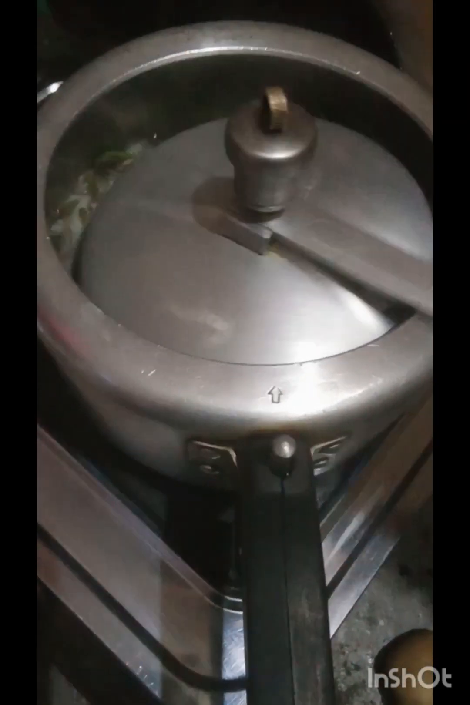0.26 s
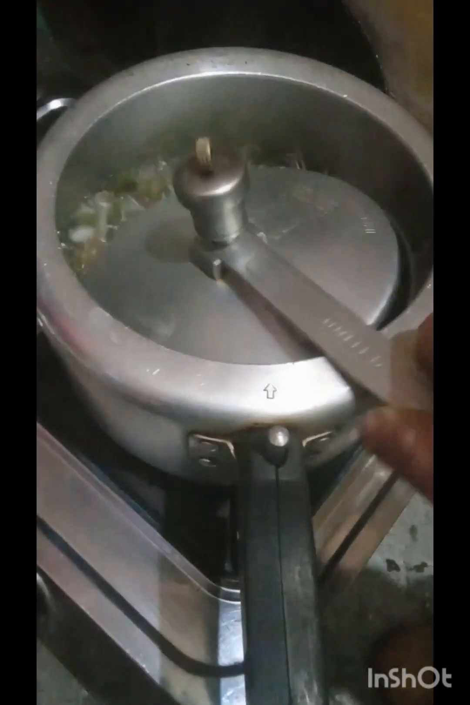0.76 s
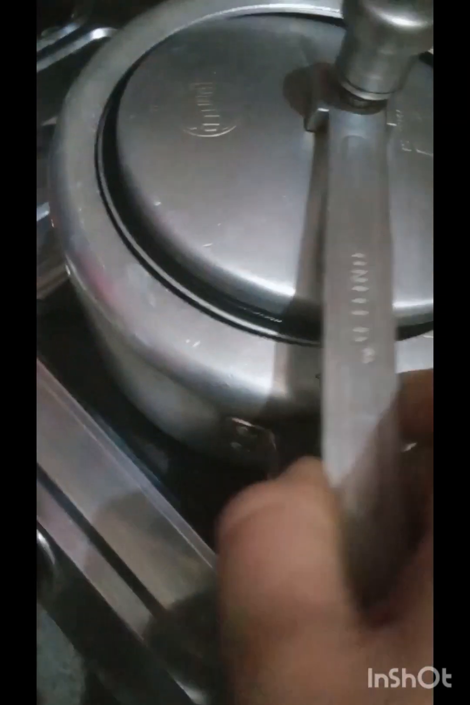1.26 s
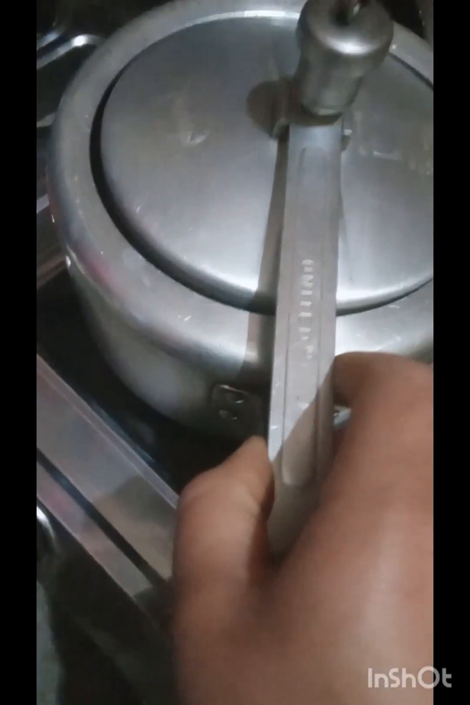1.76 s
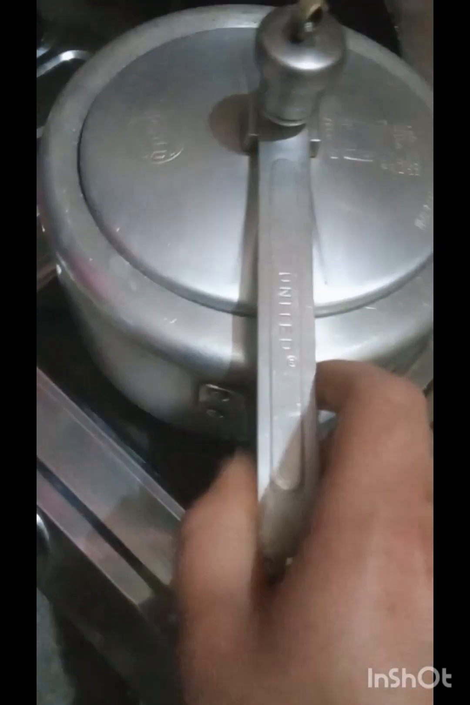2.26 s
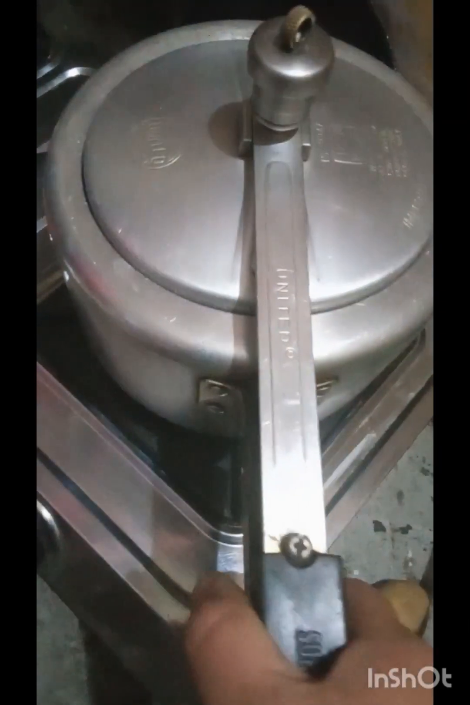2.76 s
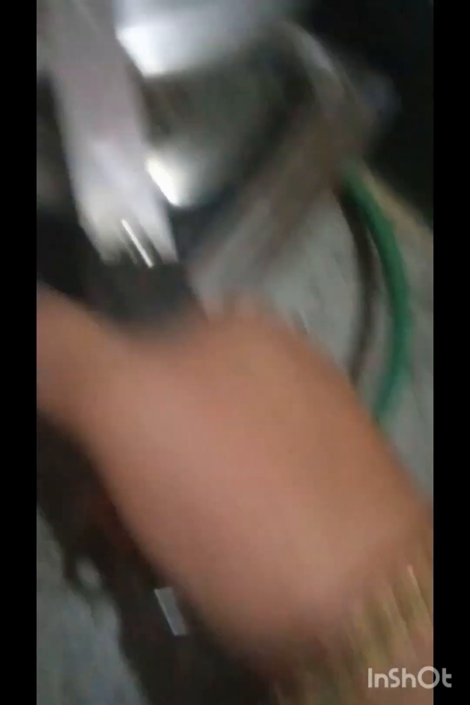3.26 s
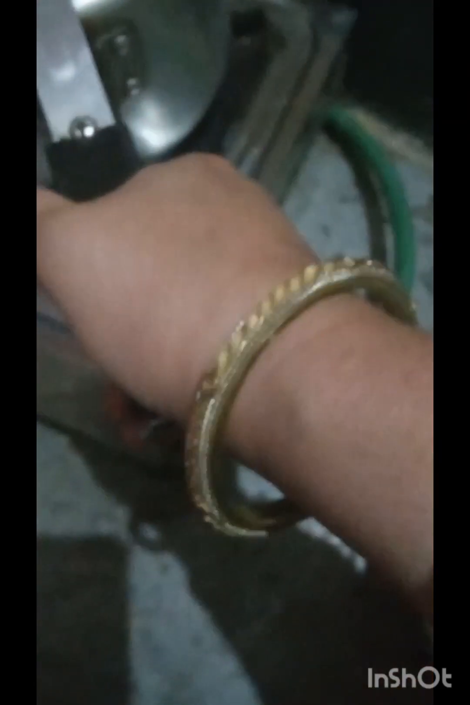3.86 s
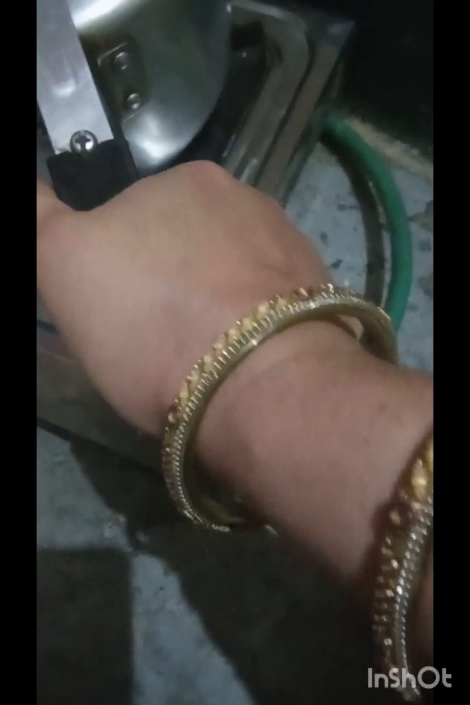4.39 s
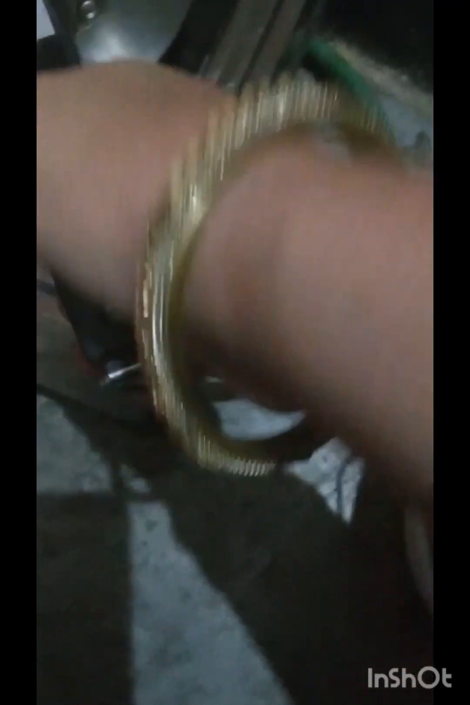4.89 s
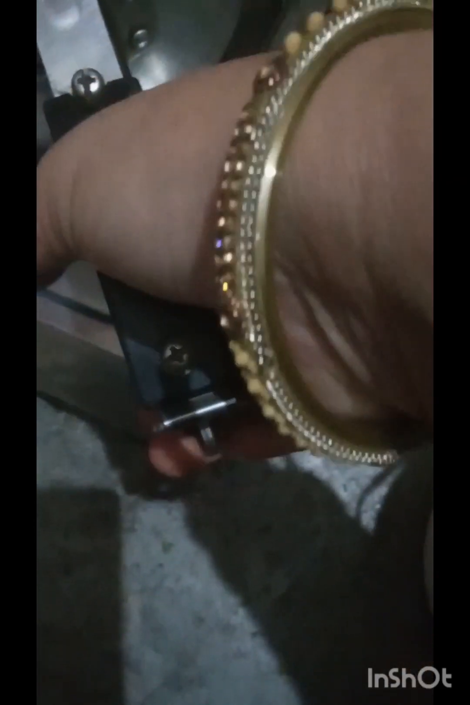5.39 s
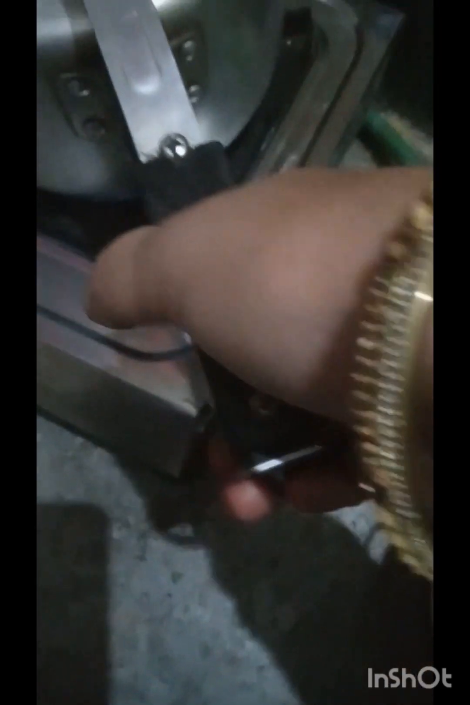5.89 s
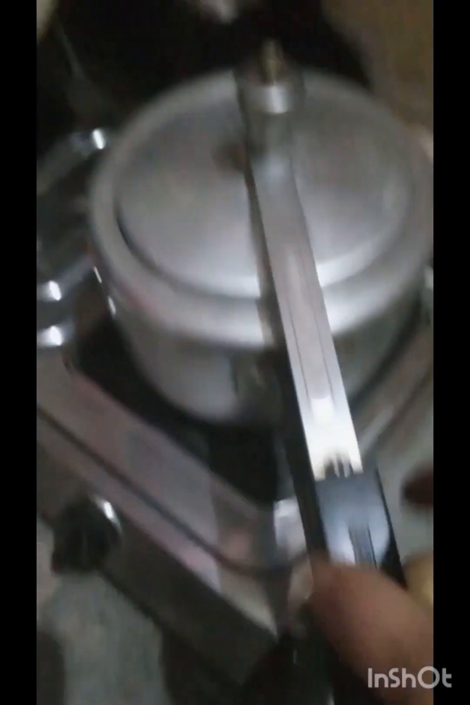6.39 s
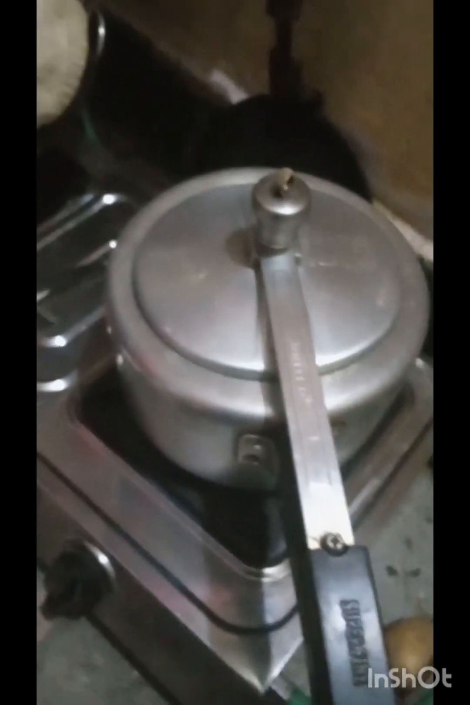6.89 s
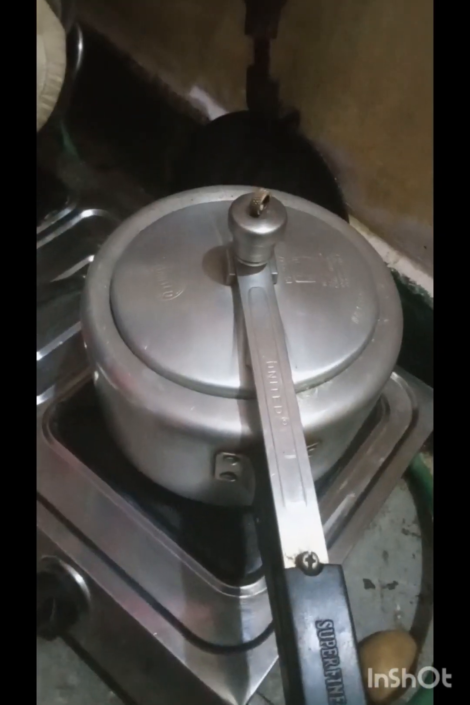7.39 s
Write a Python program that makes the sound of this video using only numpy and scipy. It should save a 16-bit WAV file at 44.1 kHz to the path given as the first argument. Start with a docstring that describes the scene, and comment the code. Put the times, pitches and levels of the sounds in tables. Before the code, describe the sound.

In a small hard kitchen, close to a phone, a cooker bubbles with low gurgle and bright popping. A metal lid clanks and scrapes into the pot, dulling the bubbles. The handle clicks and snaps shut with a light jingle, and the bubbling is sealed off. After a near-quiet stretch of tiny touches come a double knock, a short singing squeak, and faint gas hiss.

```python
"""A pressure cooker bubbles, low gurgle and bright popping, in a small, hard kitchen, heard by a phone held close.
Its metal lid clanks into the pot (struck modes and noise cracks) and muffles the bubbling; the handle bar clicks
as it is pressed shut, bangles jingle, and the gasket seals off the rest. Small knocks and brushes move on to the stove.
The gas burner then hisses faintly (flickering noise bands), and a dry metal joint squeaks (stick-slip tones)."""
import sys
import numpy as np
from scipy import signal
from scipy.fft import rfft, irfft
from scipy.io import wavfile
from scipy.ndimage import uniform_filter1d

SR = 44100
rng = np.random.default_rng(int(sys.argv[2]) if len(sys.argv) > 2 else 0)


def transcribe(signal):
    """Save signal, clipped to [-1, 1], as a 16-bit WAV file at the path in sys.argv[1]."""
    frames = np.atleast_2d(signal).T
    limited = np.clip(frames, -1, 1)
    pcm = np.round(limited * 32767).astype(np.int16)
    wavfile.write(sys.argv[1], SR, pcm)


N = 337264
TIME = np.arange(N) / SR
RING_TIME = np.arange(SR // 3) / SR

# spectral outline of the popping and of the scraping rim: (frequency [Hz], gain [dB])
POP_COLOUR = [(200, -21.5), (450, -11), (700, -8), (1600, -3), (2000, -8), (2700, -7), (3200, -18),
              (4200, -14), (6000, -17.5), (9000, -28), (12000, -38.5), (16000, -38.5)]
# spectral outline of skin on the handle and of the squeak's rasp: (frequency [Hz], gain [dB])
RASP_COLOUR = [(40, -45), (500, 6), (1300, 6.5), (5500, 4), (8500, -16), (9700, -16), (11000, -26),
               (15500, -24)]


def undb(db):
    """Decibels to amplitude ratio."""
    return 10 ** (np.asarray(db) / 20)


def unit(x):
    """Scale to rms 1."""
    return x / np.sqrt(np.mean(x ** 2) + 1e-20)


def curves(table):
    """Columns of a table, joined by straight lines in time."""
    s, *columns = np.transpose(table)
    return [np.interp(TIME, s, c) for c in columns]


def walk(rate_hz):
    """Smooth chance of rms 1: noise averaged twice over 1 / rate."""
    size = max(int(SR / rate_hz), 2)
    once = uniform_filter1d(rng.standard_normal(N), size)
    return unit(uniform_filter1d(once, size))


def colour(x, points):
    """Minimum-phase filter with the given (Hz, dB) outline, built from its cepstrum."""
    size = 2048
    hz, db = np.transpose(points)
    bin_hz = np.arange(size // 2 + 1) * SR / size
    gain = undb(np.interp(np.log(bin_hz + 1), np.log(hz), db))
    cepstrum = irfft(np.log(gain))
    # fold the cepstrum to make the filter causal
    cepstrum[1:size // 2] *= 2
    cepstrum[size // 2 + 1:] = 0
    impulse = irfft(np.exp(rfft(cepstrum)))
    return signal.fftconvolve(x, impulse)[:len(x)]


def splitter(edges_hz):
    """Butterworth filters for the bands below, between and above the edges."""
    order = 4
    lowest = signal.butter(order, edges_hz[0], fs=SR, output="sos")
    inner = [signal.butter(order, pair, "band", fs=SR, output="sos") for pair in zip(edges_hz, edges_hz[1:])]
    highest = signal.butter(order, edges_hz[-1], "high", fs=SR, output="sos")
    return [lowest, *inner, highest]


FOUR_BANDS, TWO_BANDS = splitter([900, 1600, 4500]), splitter([4500])
HISS_BANDS = splitter([1500, 3000, 4700, 5700, 7300])


def fade(t, t60):
    """Exponential decay by 60 dB in t60, in the unit of t."""
    return np.exp(-np.log(1000) * t / max(t60, .002))


def add(out, s, sound):
    """Mix a sound in at s seconds."""
    start = max(int(s * SR), 0)
    out[start:start + len(sound)] += sound[:N - start]


def room(x, wet_db):
    """Close hard walls: a diffuse tail that dies slightly sooner in the treble."""
    t60_low_s, t60_high_s, gap_s = 0.32, 0.3, 0.0038
    t = TIME[:SR // 2]
    tail = np.zeros(len(t))
    for sos, t60_s in zip(FOUR_BANDS, np.linspace(t60_low_s, t60_high_s, len(FOUR_BANDS))):
        tail += signal.sosfilt(sos, rng.standard_normal(len(t))) * fade(t, t60_s)
    # silent for one gap, then rising over a second
    tail *= np.clip(t / gap_s - 1, 0, 1)
    return x + undb(wet_db) * signal.fftconvolve(x, tail / np.linalg.norm(tail))[:N]


def ring(modes, detune=1 / 700, patchy_db=2):
    """Free decay of an object; every contact weights and detunes its modes differently."""
    out = np.zeros(len(RING_TIME))
    for (hz, db, t60_s), chance in zip(modes, rng.standard_normal((len(modes), 3))):
        gain = undb(db + patchy_db * chance[0]) * np.sign(chance[1])
        tone = np.sin(2 * np.pi * hz * (1 + detune * chance[2]) * RING_TIME)
        out += gain * tone * fade(RING_TIME, t60_s)
    return out


def crack(t60_s, dense_db, snap_db, snap_s):
    """Noise for the snap of a contact and the crowd of short-lived modes that follows it."""
    envelope = undb(dense_db) * fade(RING_TIME, t60_s) + undb(snap_db) * fade(RING_TIME, snap_s)
    return rng.standard_normal(len(RING_TIME)) * envelope


def chatter(blow, span_s, bounce_db, count=5):
    """Metal never lands just once: a few weaker touches follow within milliseconds."""
    out = blow.copy()
    for when, size in rng.random((count, 2)):
        lag = 1 + int(span_s * SR * when)
        out[lag:] += undb(bounce_db) * (2 * size - 1) * blow[:-lag]
    return out


def strike(blow, bands, levels_db):
    """The spot that is hit sets the strength of each band over the first 8 ms."""
    attack = SR // 125
    parts = [signal.sosfilt(sos, blow) for sos in bands]
    return sum(p * undb(db) / np.std(p[:attack]) for p, db in zip(parts, levels_db))


def blow_levels(db, ring_db, treble_db, upper_db=3):
    """Four band levels of a blow; the upper modes follow both the ring and the hardness of the contact."""
    follow = 0.3
    return [db, db + ring_db, db + upper_db + follow * (ring_db + treble_db), db + treble_db]


def effort(strokes):
    """Each stroke swells, holds and dies away; one shorter than the attack starts to fade before its full level."""
    attack_s, t60_s = 0.06, .12
    out = np.zeros(N)
    for s, length_s, db in strokes:
        attack = np.clip((TIME - s) / attack_s, 0, 1)
        out += undb(db) * attack * fade(np.clip(TIME - s - length_s, 0, 1), t60_s)
    return out


def rub(strokes, body, per_s, spread_db):
    """Tiny catches of uneven size keep a body ringing during each stroke."""
    when, rarity = rng.random((2, N))
    catches = (when < per_s / SR) * undb(-spread_db * np.log(np.maximum(rarity, .05)))
    return signal.fftconvolve(unit(catches) * effort(strokes), body / np.linalg.norm(body))[:N]


def kitchen():
    """Quiet room air: coloured noise whose level drifts slowly."""
    # spectral outline of the air: (frequency [Hz], gain [dB])
    air_colour = [(15, -52.5), (25, -19), (87, -7.5), (363, -3), (451, -7.5), (818, -5), (887, -4),
                  (1650, -9.5), (2110, -9), (2480, -8), (2910, -14.5), (5280, -15.5), (6560, -17),
                  (7310, -20.5), (16000, -39)]
    level_db, drift_db = -65.5, 1.1
    return unit(colour(rng.standard_normal(N), air_colour)) * undb(level_db + drift_db * walk(2))


def bubbles(per_s, low_hz, high_hz, cycles, spread_db):
    """Bubbles ring briefly and rise slightly in pitch as they burst."""
    out = np.zeros(N)
    for when, pitch, rarity in rng.random((int(per_s * N / SR), 3)):
        hz = low_hz * (high_hz / low_hz) ** pitch
        age = np.linspace(0, 1, int(cycles * SR / hz))
        gain = undb(-spread_db * np.log(max(rarity, .02)))  # a few are loud
        tone = np.sin(2 * np.pi * cycles * age * (1 + 0.011 * age))
        add(out, when * N / SR, gain * tone * fade(age, 1))
    return unit(out)


def simmer():
    """The lid first shuts in the bright popping; the gurgle, with surges of squeezed steam, lasts until the gasket seals."""
    # spectral outline of the gurgle: (frequency [Hz], gain [dB])
    gurgle_colour = [(30, -35), (60, -4), (95, 8.5), (180, -1), (350, 1.5), (550, -9.5), (1000, -25),
                     (3000, -60)]
    # steam squeezed past the closing lid: (start [s], length [s], full level [dB], resonance of the gap [Hz])
    surges = [(1.16, .17, -53.5, 405), (1.495, 0.084, -45.5, 303), (1.706, 0.084, -51, 229),
              (1.866, 0.157, -44.5, 322), (2.355, 0.19, -58.5, 192)]
    gap_q = 2.5
    open_gurgle_db, open_pop_db = -53.5, -45
    lid_in_s, lid_seated_s, lid_muffle_db = 1.264, 1.72, -19.5
    seal_from_s, sealed_s, gasket_db = 2.62, 3.05, -32
    gurgle_muffle_share = .3  # the lid holds back the gurgle less than the popping

    low_bubbles = bubbles(per_s=750, low_hz=136.2, high_hz=440, cycles=20, spread_db=4)
    gurgle = colour(low_bubbles + .35 * rng.standard_normal(N), gurgle_colour)
    bright_bubbles = bubbles(per_s=1500, low_hz=520, high_hz=6000, cycles=20, spread_db=5)
    pops = colour(bright_bubbles + .4 * rng.standard_normal(N), POP_COLOUR)

    muffle_db = np.interp(TIME, [lid_in_s, lid_seated_s], [0, lid_muffle_db])
    seal_db = np.interp(TIME, [seal_from_s, sealed_s], [0, gasket_db])
    low = unit(gurgle) * undb(open_gurgle_db + gurgle_muffle_share * muffle_db)
    for *stroke, gap_hz in surges:
        steam = signal.lfilter(*signal.iirpeak(gap_hz, gap_q, fs=SR), gurgle)
        low = low + unit(steam) * effort([stroke])
    high = unit(room(pops, wet_db=-4.5)) * undb(open_pop_db + muffle_db)
    return undb(seal_db) * (low + high)


def lid():
    """The rim scrapes and rattles into the pot's mouth; the hand damps every clank alike."""
    # lid against pot: (time [s], thud level [dB], ring of the dome over the thud [dB],
    #                   treble over the thud, high for a hard contact [dB])
    clanks = [(.003, -45.5, 10.5, -10.5), (0.0794, -23, 0, -29), (0.105, -33, -11, -9),
              (0.367, -23, -0.5, -12.5), (0.387, -26, -2.5, -76), (0.5219, -36, -12, -8.5),
              (1.0912, -27.5, 11, -4), (1.1012, -30.5, 12, 5), (1.118, -41, 18, 7),
              (1.1338, -36, 16.5, 5.5), (1.1576, -32.5, 10.5, -10), (1.1721, -25.5, 12.5, -4.5),
              (1.2001, -35.5, -1, -4.5), (1.252, -33.5, 7, -19), (1.259, -27.5, -12, -5),
              (1.281, -29.5, -8.5, -4.5), (1.42, -41, -1.5, -25), (1.8964, -39.5, 8.5, -9.5),
              (1.969, -36.5, -4, 1.5), (1.9995, -31.5, 8, -26), (2.0461, -39, -23, -10.5),
              (2.0717, -42, 7.5, 13.5), (2.1058, -49, 11, 14)]
    # modes of the hand-held lid and pot: (frequency [Hz], level [dB], t60 [s])
    lid_modes = [(355, -11, 0.28), (399, -8.5, 0.2), (495, -12.5, 0.11), (780, -7, 0.098),
                 (963, -8.5, 0.12), (1190, 7.5, 0.09), (1247, -5, 0.15), (1328, -5, 0.21),
                 (1780, -25, 0.06), (2102, -3, 0.035), (2120, -15.5, 0.12), (2260, -4, 0.067),
                 (2840, -6, 0.051), (3250, -6, 0.08), (3680, -9, 0.11), (4504, -4.5, 0.041),
                 (4770, -20.5, 0.037), (5150, -18.5, 0.085), (5280, -6, 0.027), (6350, -1.5, 0.018)]
    # spectral outline of a clank: (frequency [Hz], gain [dB])
    lid_colour = [(25, -49.5), (70, -29), (200, -19), (450, -3.5), (900, 2), (2500, 4.5), (3600, -5),
                  (6500, -9.5), (9500, -20.5), (11500, -38), (16000, -40.5)]
    # rim dragging over the pot: (start [s], length [s], full level [dB])
    scrapes = [(.66, .32, -52), (.705, 0.031, -39.5), (1.1, 0.21, -39), (1.42, 0.026, -35.5),
               (1.872, 0.135, -42), (2.1, 0.078, -47), (2.4, 0.059, -55)]

    rim = colour(ring(lid_modes) + crack(.04, dense_db=17, snap_db=18, snap_s=.002), POP_COLOUR)
    out = rub(scrapes, rim, per_s=1200, spread_db=6.5)
    for s, db, dome_db, treble_db in clanks:
        contact = crack(.05, dense_db=10, snap_db=14.5, snap_s=.0029)
        blow = ring(lid_modes, detune=.006, patchy_db=3) + chatter(contact, span_s=.013, bounce_db=-12.5)
        add(out, s, strike(colour(blow, lid_colour), FOUR_BANDS, blow_levels(db, dome_db, treble_db)))
    return room(out, wet_db=-16)


def handle():
    """Small metal parts snap over each other, each contact with a brief ping of its own; bangles jingle between them."""
    # handle bar, latch and other small metal parts: (time [s], treble level [dB], body over the treble [dB],
    #                                                 ping [Hz], strength of the rebound [0-1])
    clicks = [(.095, -40, 1, 5400, 0.46), (0.282, -49, -6, 6420, 1), (0.327, -52, 8.5, 6200, 0.5),
              (0.3738, -37, 11, 5540, 0), (0.5406, -35.5, -12, 7760, 0.54),
              (1.5228, -24.5, -5.5, 8200, 0.52), (1.5943, -37, -15, 7070, 0), (1.76, -36.5, -3, 4560, 0.24),
              (2.2209, -38.5, -14, 8910, 0), (2.261, -40, -13, 7200, 0.87), (2.3103, -51, 4, 7100, 0.11),
              (2.3241, -36.5, -7.5, 6930, 0.83), (2.433, -44, 3, 7330, 0.17), (2.5188, -41, -8, 7400, 0.33),
              (2.617, -49.5, -2, 5580, 0.2), (2.69, -46, -7.5, 6960, 0.8), (2.7224, -23.5, -16.5, 7800, .3),
              (3.011, -45.5, -17, 7200, 0), (3.06, -28.5, -48, 6830, 0.12), (3.096, -40, -12, 6830, 0.05),
              (4.002, -70, 13.5, 5870, 0.35), (4.1667, -56, -14, 5940, 0), (4.2655, -40.5, -36, 6140, 0),
              (4.4803, -54.5, -6, 7800, 0), (4.5672, -54, 8.5, 3810, 1), (5.0743, -67, 18.5, 6250, 0.05)]
    # modes of the bangles and small handle parts: (frequency [Hz], level [dB], t60 [s])
    bar_modes = [(2030, -7.5, 0.097), (2693, -9, 0.11), (3300, -17, 0.1), (4440, -10, 0.15),
                 (6930, -4, 0.027), (7500, -4.5, 0.047), (7370, -9, 0.09), (7600, -11.5, 0.051),
                 (9580, -2, 0.053)]
    # spectral outline of a click: (frequency [Hz], gain [dB])
    bar_colour = [(100, -59.5), (500, -9.5), (1300, 2), (2400, 12), (3500, 0.5), (5000, 1.5), (7800, 3),
                  (9900, -5.5), (11200, -26), (16000, -27.5)]
    # bangles trembling as the wrist moves: (start [s], length [s], full level [dB])
    jingles = [(2.26, .33, -51.5), (2.77, 0.025, -42), (2.975, 0.075, -46.5), (3.62, 0.16, -74),
               (4.74, 0.07, -64.5)]
    rebound_s = .012  # a part that snaps over touches again this much later
    even_contact_s, body_db_per_doubling = .092, 11  # the more body a click has, the longer it lasts
    thin_body_db, thin_cut = -14.5, .77  # a click with less body is cut below this share of its ping

    # bangles only graze each other: hardly any snap, little body under the treble
    bangles = colour(ring(bar_modes) + crack(.04, dense_db=1, snap_db=6, snap_s=.003), bar_colour)
    bangles = strike(bangles, TWO_BANDS, [-17, 0])
    out = rub(jingles, bangles, per_s=150, spread_db=6.5)
    for s, db, body_db, hz, rebound in clicks:
        contact_s = np.clip(even_contact_s * 2 ** (body_db / body_db_per_doubling), .022, .1)
        for delay_s, size in [(0, 1), (rebound_s, rebound)]:
            ping = undb(12) * np.sin(2 * np.pi * hz * RING_TIME) * fade(RING_TIME, .022)
            # a quick release is nearly all snap; a longer contact sets the unlike parts ringing
            ringing = min(contact_s / .055, .8) * ring(bar_modes, detune=.012, patchy_db=3)
            contact = crack(contact_s, dense_db=6, snap_db=15, snap_s=.006)
            blow = chatter(ringing + ping + contact, span_s=.0059, bounce_db=-9.5)
            # the lightest parts have little below their own high pitch
            if body_db < thin_body_db:
                blow = signal.sosfilt(signal.butter(4, thin_cut * hz, "high", fs=SR, output="sos"), blow)
            click = strike(colour(blow, bar_colour), TWO_BANDS, [db + body_db, db])
            add(out, s + delay_s, size * click)
    return room(out, wet_db=-21)


def knocks():
    """Softer, blunt contacts that fill the room; the hand brushes the handle between them."""
    # knocks and scuffs at the handle and stove: (time [s], thud level [dB], ring over the thud [dB],
    #                                             treble over the thud [dB])
    contacts = [(2.6317, -50.5, -3, -18), (2.6537, -50.5, -3, -1), (2.9084, -45, -2, -13.5),
                (4.073, -66.5, 8, 7.5), (4.6502, -56, 2, -12), (4.9073, -43.5, -1, -19.5),
                (5.152, -66.5, 12, 3.5), (5.7966, -34, -12.5, -12), (5.8098, -33.5, -3.5, -14.5),
                (5.8265, -41.5, -7, -30), (7.0978, -65.5, 8.5, 2)]
    # modes of the stove body: (frequency [Hz], level [dB], t60 [s])
    stove_modes = [(345, -3, 0.12), (538, -12.5, 0.35), (715, -3.5, 0.051), (850, -0.5, 0.088),
                   (1160, 1.5, 0.075), (1350, -1.5, 0.17), (1850, -10.5, 0.2), (2096, 2.5, 0.073)]
    # spectral outline of a knock: (frequency [Hz], gain [dB])
    stove_colour = [(25, -69.5), (70, -23), (200, -17), (330, -6), (2100, 9.5), (3300, 0), (5600, -7.5),
                    (8000, -22), (16000, -56)]
    # hand brushing along the handle: (start [s], length [s], full level [dB])
    brushes = [(3.4, 0.046, -68), (4.02, 0.07, -61), (5.42, 0.046, -60), (5.58, 0.063, -66)]

    skin = colour(crack(.01, dense_db=0, snap_db=0, snap_s=.003), RASP_COLOUR)
    out = rub(brushes, skin, per_s=1500, spread_db=4)
    for s, db, ring_db, treble_db in contacts:
        blow = ring(stove_modes) + crack(.11, dense_db=14.5, snap_db=-29, snap_s=.012)
        levels_db = blow_levels(db, ring_db, treble_db, upper_db=-4.5)
        add(out, s, strike(colour(blow, stove_colour), FOUR_BANDS, levels_db))
    return room(out, wet_db=-5.5)


def swell(start_s, rise_s, db):
    """A flow that sets in and settles at its full level."""
    return undb(db) * (1 - np.exp(-np.maximum(TIME - start_s, 0) / rise_s))


def burner():
    """The flame rushes at the ports, then the jet's high hiss joins as the gas opens fully; each band flickers on its own."""
    # spectral outline of the gas: (frequency [Hz], gain [dB])
    gas_colour = [(100, -13), (800, 7), (2300, 4), (3200, -2), (4600, 2.5), (5100, 13.5), (5700, 6),
                  (6100, 3), (6450, 9.5), (7300, 2.5), (9300, -1), (10500, -15), (15500, -25)]
    flicker_db = 2.3
    rush = unit(colour(rng.standard_normal(N), gas_colour))
    bands = [signal.sosfiltfilt(sos, rush) * undb(flicker_db * walk(45)) for sos in HISS_BANDS]
    flame, jet = sum(bands[:3]), sum(bands[3:])
    early = (flame + undb(-10.5) * jet) * swell(start_s=5.7, rise_s=.45, db=-58.5)
    return early + jet * swell(start_s=6.51, rise_s=.05, db=-66.5)


def slip(table, overtones_db, rasp_db):
    """Stick-slip cycles; when the grip is rough their length and strength waver and they rasp."""
    hz, db, rough = curves(table)
    waver = 1 + .022 * rough * walk(900) + .002 * walk(120)
    phase = 2 * np.pi * np.cumsum(hz * waver) / SR
    flutter = undb(3 * rough * walk(130))
    # each slip lets go a little early or late, which smears the overtones
    smear = (.23 + .06 * rough) * walk(350)
    overtones = np.zeros(N)
    for k, overtone_db in enumerate(overtones_db, 2):
        overtones += undb(overtone_db + 3 * walk(110)) * np.sin(k * (phase + smear))
    rasp = unit(colour(rng.standard_normal(N) * (1 + np.cos(phase)), RASP_COLOUR))
    rasp = rasp * rough ** 2 * undb(rasp_db)
    inside = 1. * (TIME > table[0][0]) * (TIME < table[-1][0])
    sounding = uniform_filter1d(inside, size=SR // 250)  # 4 ms ramps
    tone = np.sqrt(2) * (flutter * np.sin(phase) + (.5 + rough) * overtones)
    return sounding * undb(db) * (tone + rasp)


def squeak():
    """A dry metal joint sings as it is moved, then drops to a lower, ragged note."""
    # steady slip regime: (time [s], pitch [Hz], level [dB], roughness [0-1])
    steady_path = [(5.895, 1146, -65, 0.25), (5.905, 1148, -29, 0.42), (5.92, 1268, -24.5, 0),
                   (5.955, 1238, -19.5, 0), (5.97, 1346, -23, 0.8), (5.985, 1375, -17.5, 0),
                   (6.0, 1370, -18, 0.04), (6.025, 1363, -44, .6)]
    # falling, ragged slip regime: (time [s], pitch [Hz], level [dB], roughness [0-1])
    ragged_path = [(5.985, 1200, -32, 0.82), (5.998, 1114, -26, 1), (6.02, 1112, -28.5, 1),
                   (6.045, 1105, -32, 1), (6.057, 990, -32, 0.55), (6.1, 1066, -67, 0.53)]
    steady = slip(steady_path, [-14, -23, -21.5, -30, -36, -33.5, -44], rasp_db=-19)
    ragged = slip(ragged_path, [-9.5, -20, -20.5, -25, -31, -38, -60], rasp_db=-13)
    return room(steady + ragged, wet_db=-14.5)


def scene():
    """All layers summed to one channel."""
    return (kitchen() + simmer() + lid() + handle() + knocks() + burner() + squeak())[None]


def record(dry):
    """The phone rounds the loudest peaks and cuts the top."""
    top_hz, ceiling = 15900, .7
    rounded = ceiling * np.tanh(dry / ceiling)
    return signal.sosfilt(signal.ellip(10, .2, 80, top_hz, fs=SR, output="sos"), rounded)


dry = scene()
out = record(dry)
transcribe(out)
```